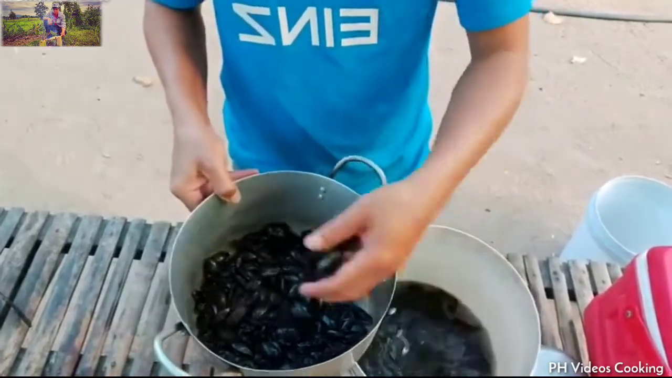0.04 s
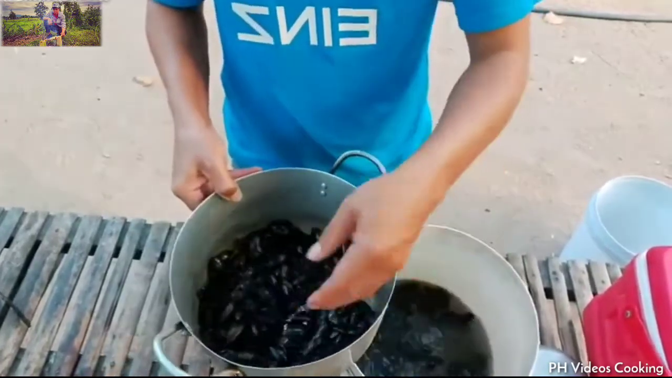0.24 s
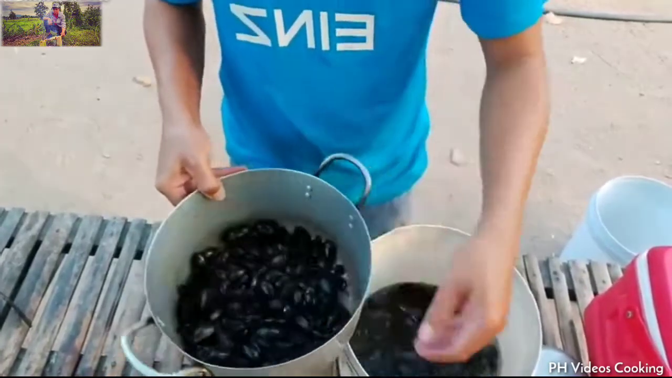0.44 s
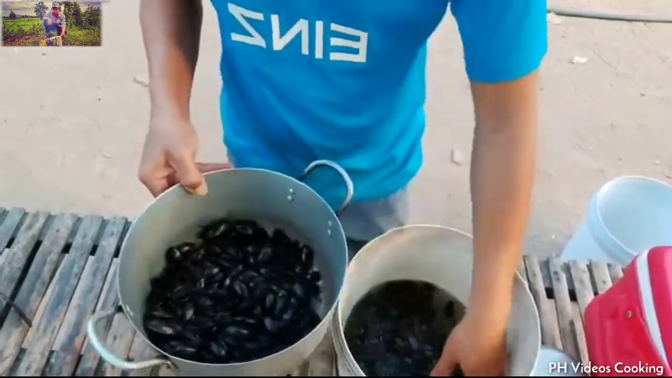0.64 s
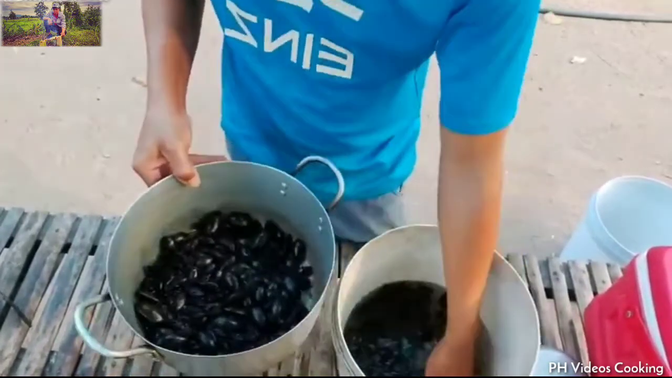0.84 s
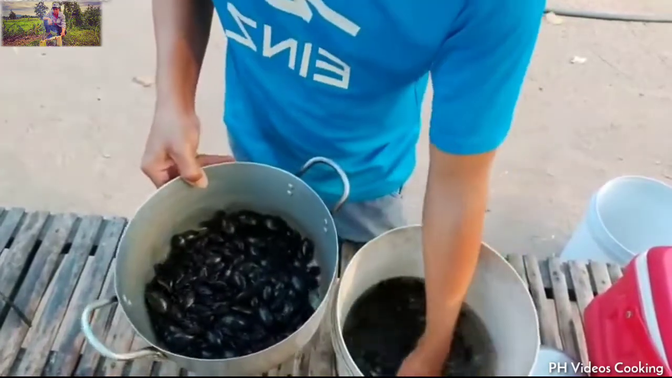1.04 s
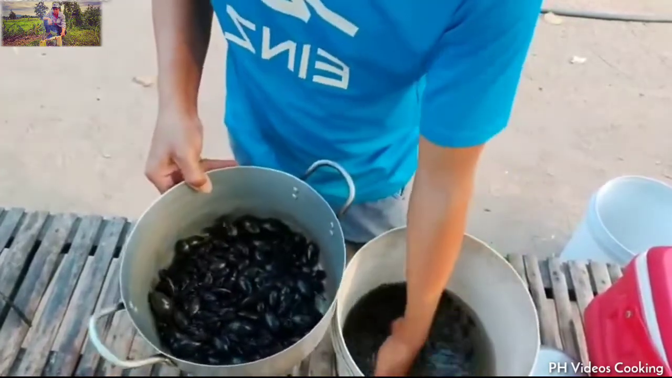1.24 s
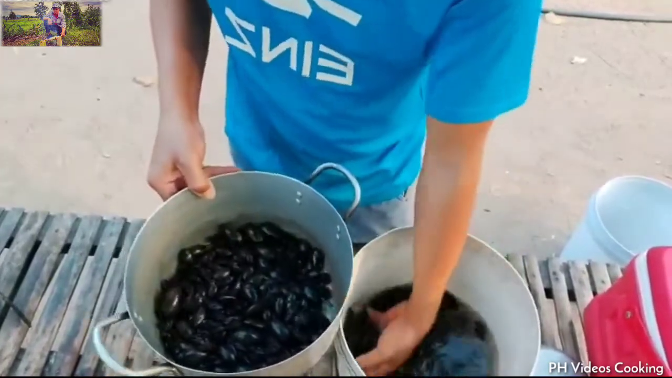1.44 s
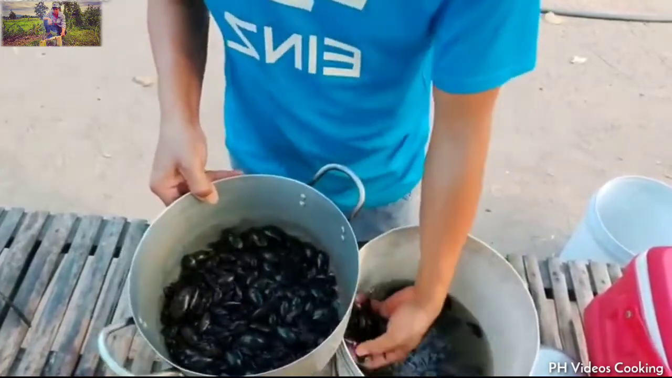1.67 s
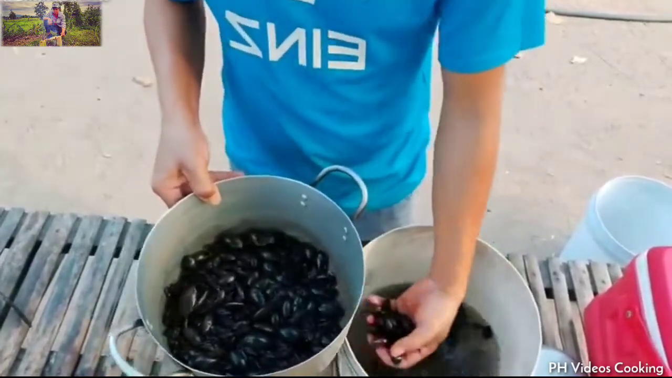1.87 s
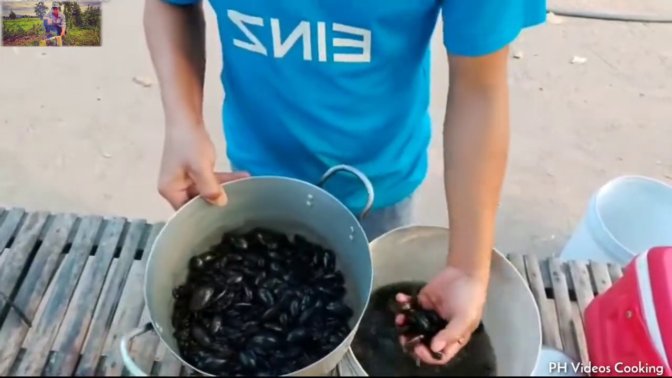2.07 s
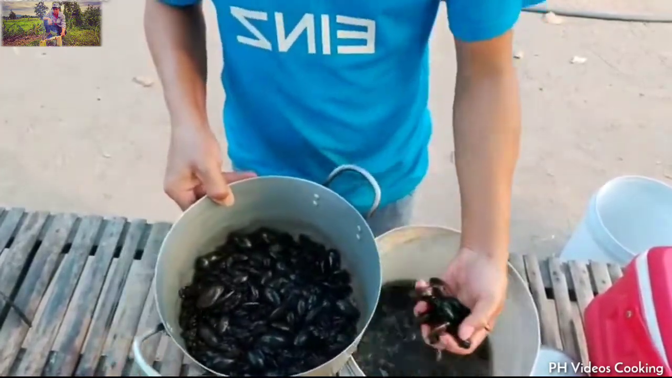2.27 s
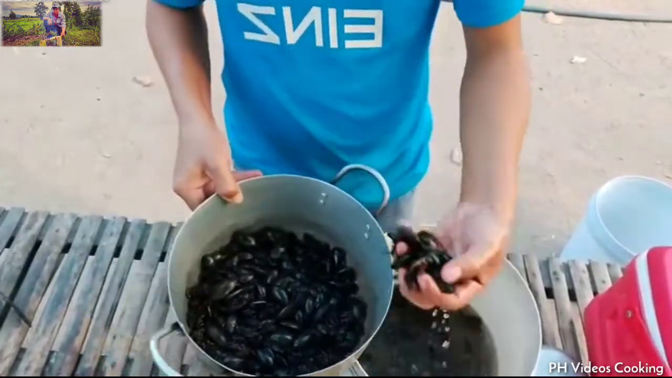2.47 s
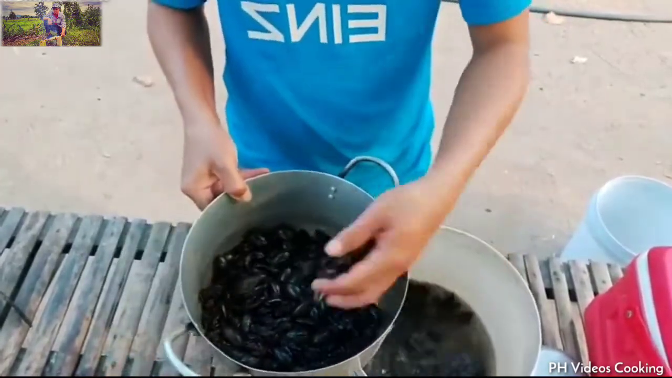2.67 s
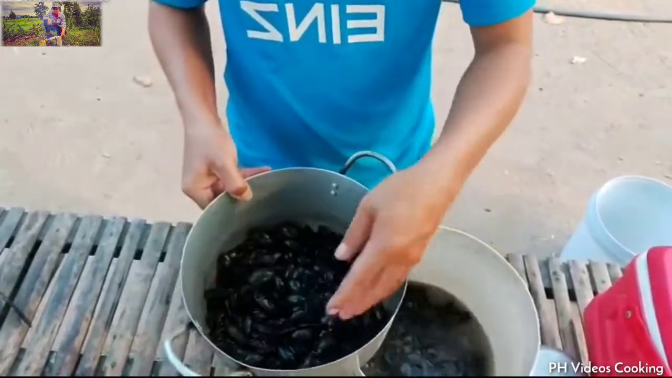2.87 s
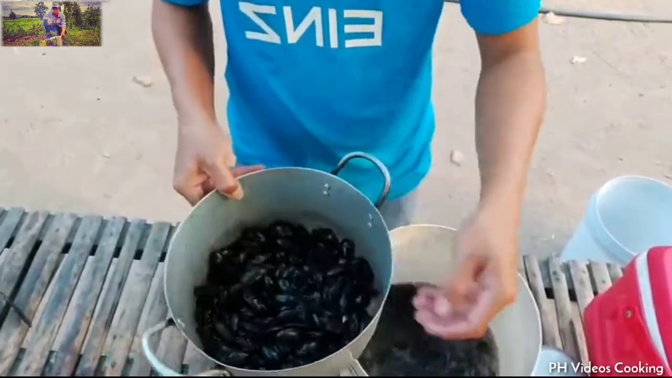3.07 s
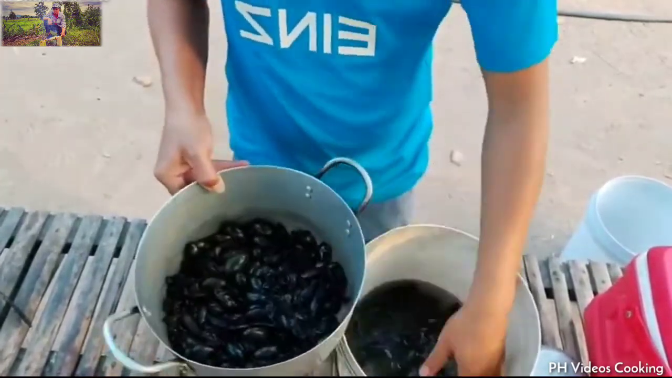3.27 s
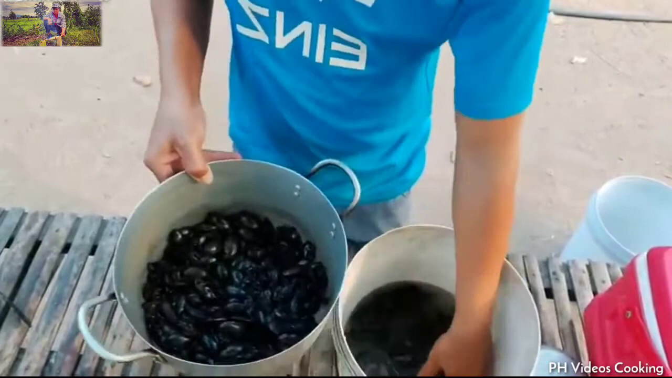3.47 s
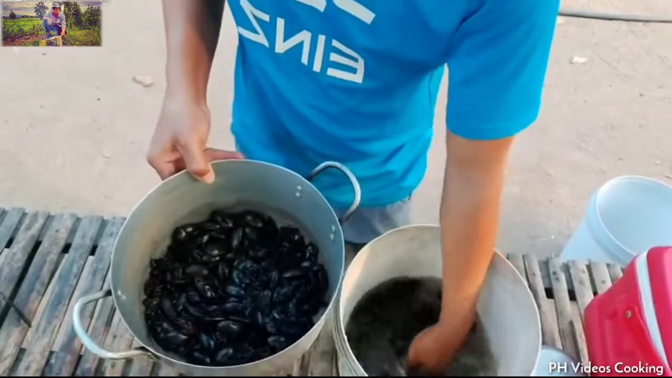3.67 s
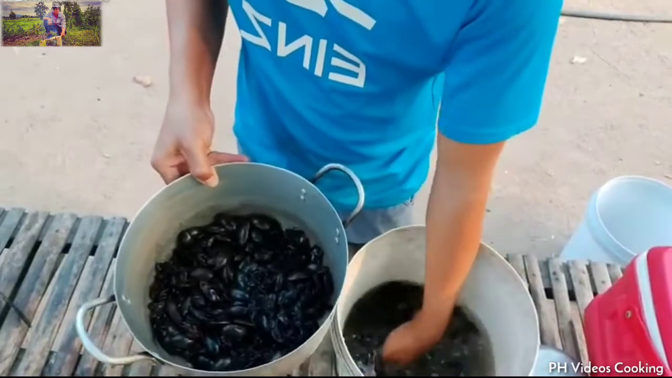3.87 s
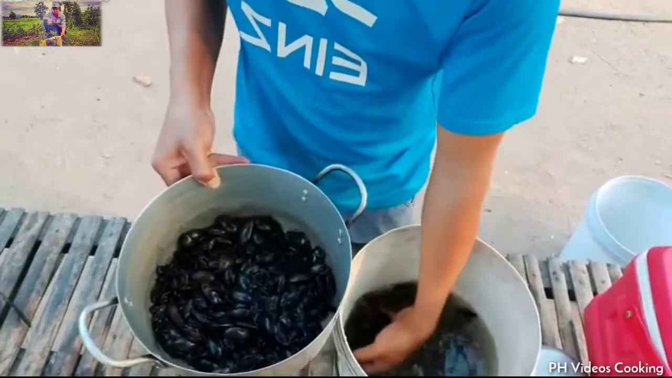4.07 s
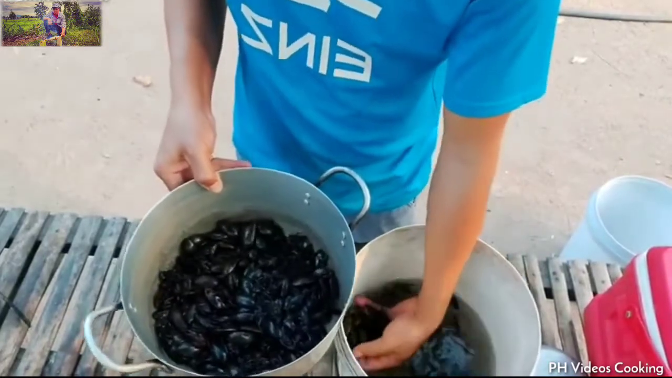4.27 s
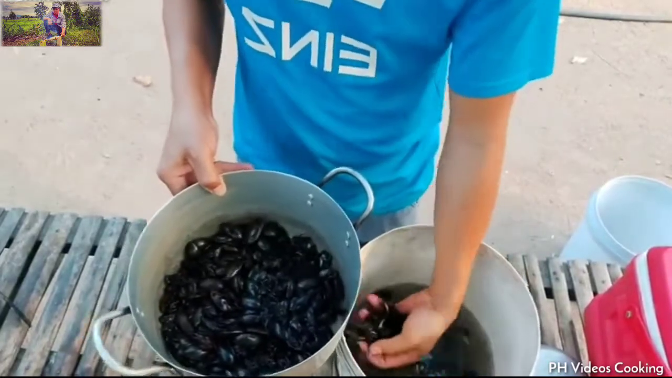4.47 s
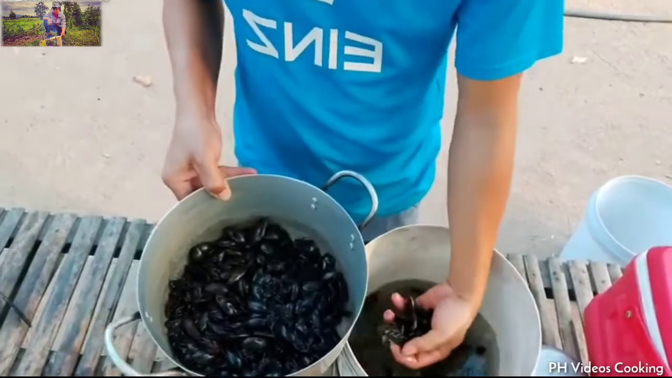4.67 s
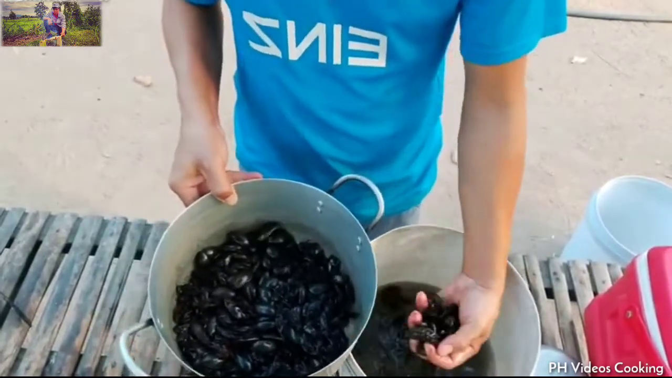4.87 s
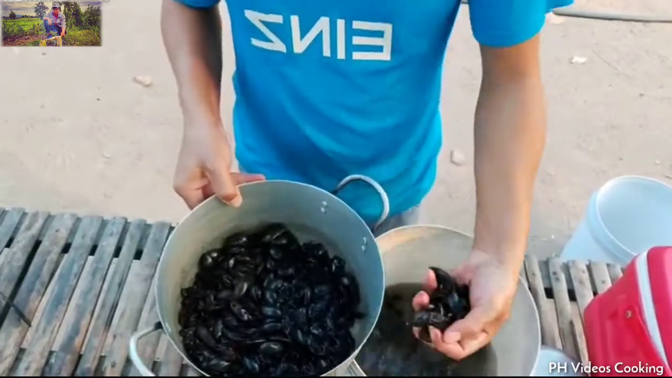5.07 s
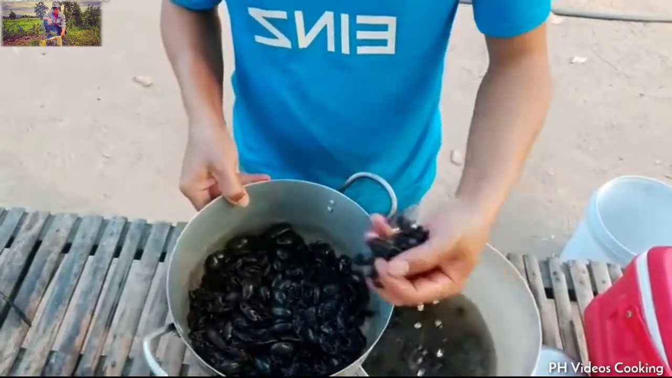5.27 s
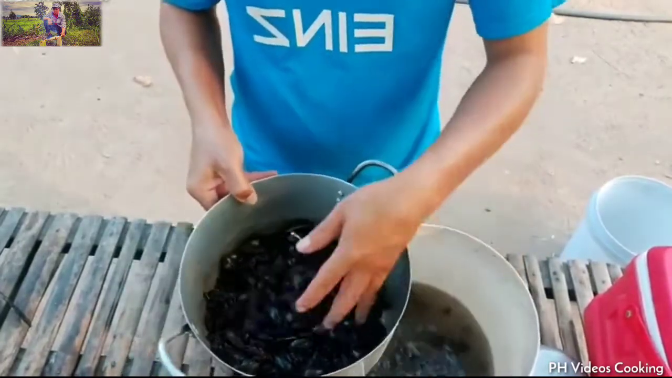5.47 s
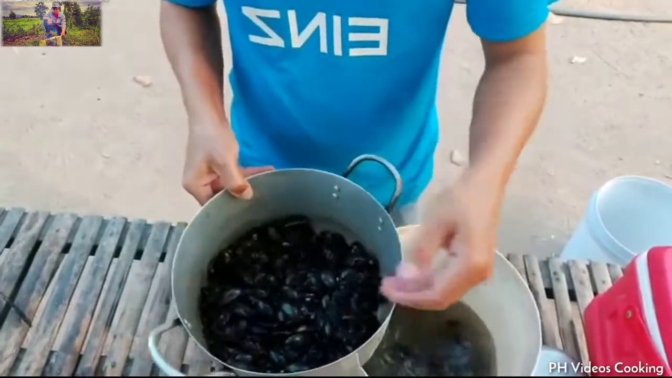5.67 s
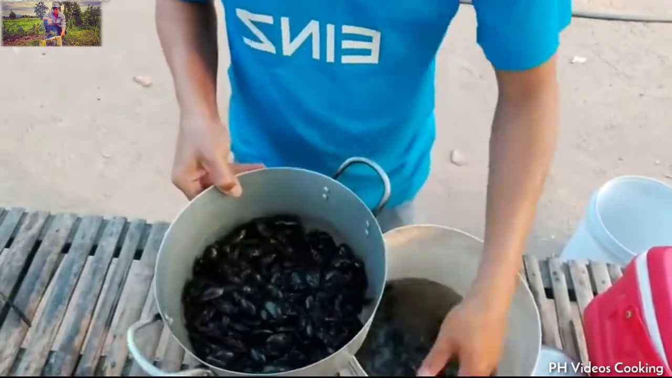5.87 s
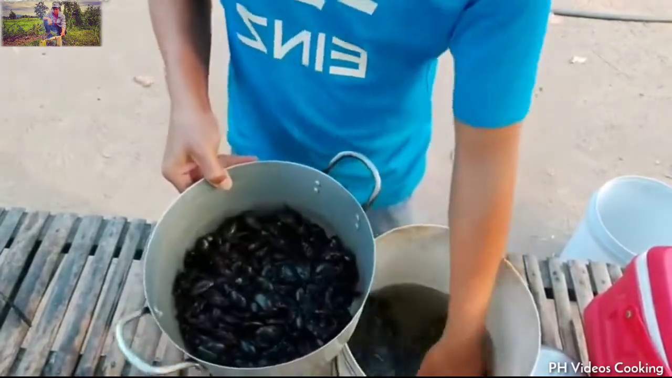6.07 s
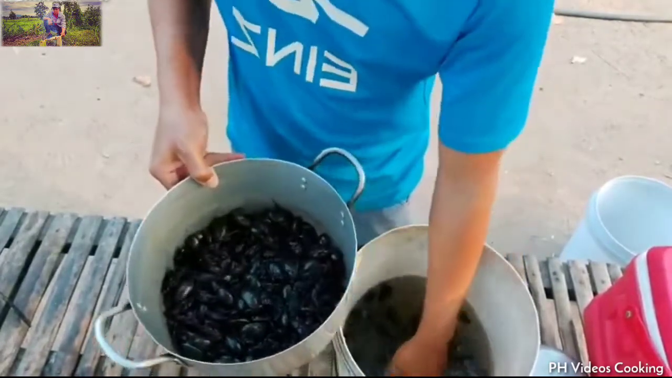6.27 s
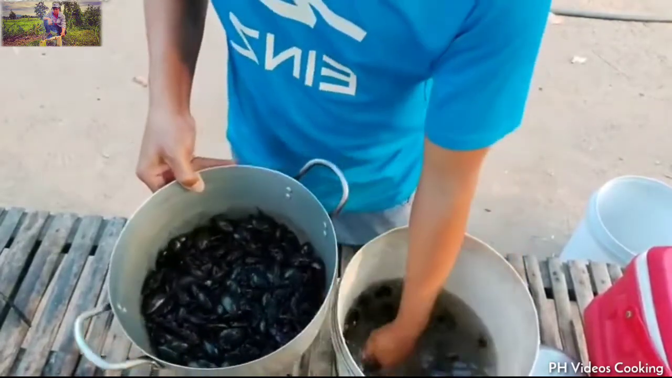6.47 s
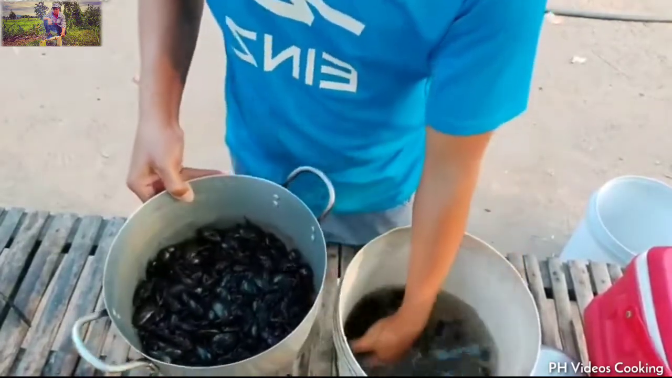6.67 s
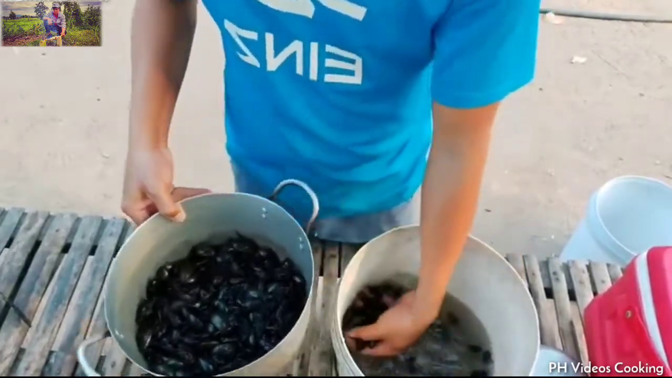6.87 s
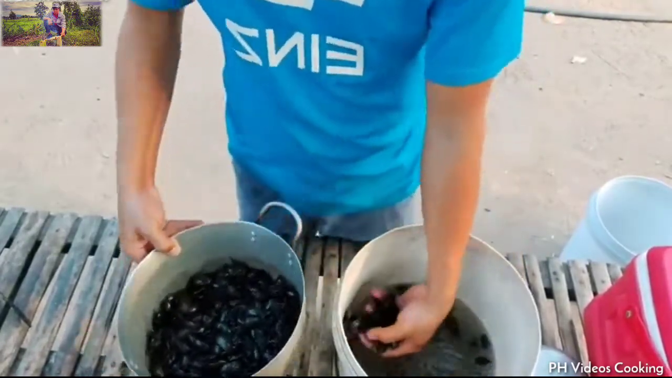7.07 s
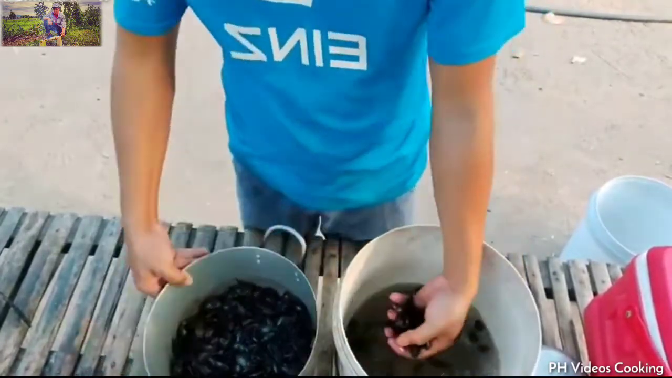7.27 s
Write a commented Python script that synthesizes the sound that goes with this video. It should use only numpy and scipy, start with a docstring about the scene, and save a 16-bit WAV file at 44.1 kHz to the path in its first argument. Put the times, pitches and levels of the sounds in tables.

```python
"""Outdoors, a hand rummages for small shellfish in a metal tub of water and drops three handfuls into a half-full pot.
Each handful clatters on the heap (filtered noise and tiny rings) and thumps the pot (decaying tones). Between them
shells rub and knock under water, bubbles and drips ring, the lifted hand dribbles, and the pot bumps on its
slatted bench. A steady hush and the rumble of a light breeze, both filtered noise, lie underneath."""
import sys
import numpy as np
from scipy import signal
from scipy.fft import rfft, irfft
from scipy.io import wavfile
from scipy.ndimage import uniform_filter1d

SR = 44100
rng = np.random.default_rng(int(sys.argv[2]) if len(sys.argv) > 2 else 0)


def log_audio(samples):
    """Write samples as a 16-bit WAV file to the path given in sys.argv[1]."""
    # one column per channel
    frames = np.atleast_2d(samples).T
    # limit to full scale, then quantise
    limited = np.clip(frames, -1, 1)
    pcm = np.round(limited * 32767).astype(np.int16)
    wavfile.write(sys.argv[1], SR, pcm)


N = 323244  # samples
T = np.arange(N) / SR  # seconds
SHORT = T[:SR // 3]  # time axis of one brief sound, seconds
POT_LEAD_MS, TUB_LEAD_MS = 0.14, 0.062  # how much earlier the left side hears each vessel
TOP_HZ = 15700

# In all tables, t60 is the time a ring takes to fall by 60 dB, and levels are relative.
# Handfuls sliding on to the heap, which then settles. Each row: start in seconds, pouring time in seconds,
# clatter in dB, pot boom in dB, settling time in seconds, settling in dB, treble boost in dB.
HANDFULS = [(0.236, 0.049, -31, -27.5, 0.27, -49.5, 3), (2.834, 0.053, -35, -34.5, 0.33, -50.5, -0.5),
            (5.552, 0.034, -29, -31, 0.19, -44, -2)]
# Scoops: the hand gropes, rakes shells together, then lifts them out to drain.
# Each row: start of raking in seconds, raking time in seconds, level at its end in dB.
SCOOPS = [(1.0, 0.59, -49.5), (3.918, 0.27, -49.5), (6.5, 0.31, -48)]
# Tone colour of fine water spray. Each row: frequency in Hz, level in dB.
SPRAY = [(4000, -16.5), (6500, -2), (10500, -1.5), (15500, -7)]


def handfuls():
    """Shells shower on the heap in clumps with small clacks of many pitches; the wall rings and the loaded pot booms."""
    # The heaviest clumps landing. Each row: start in seconds, crash in dB, thump in dB, thump pitch in Hz.
    clumps = [(0.202, -28, -32.5, 468), (0.236, -17, -18.5, 506), (0.258, -19, -23, 490),
              (0.278, -26, -18, 484), (0.297, -30, -21.5, 492), (0.331, -32, -27, 488),
              (0.35, -39, -28.5, 503), (0.388, -45, -33.5, 462), (2.808, -18, -33, 458),
              (2.831, -19, -25, 464), (2.845, -17.5, -19.5, 500), (2.871, -15.5, -14, 510),
              (2.901, -23.5, -22, 434), (2.928, -20.5, -55, 452), (5.521, -20, -30, 490),
              (5.551, -12.5, -26.5, 515), (5.584, -16.5, -20, 510), (5.593, -20, -24, 340),
              (5.631, -22.5, -32, 496), (5.661, -22.5, -40, 438), (5.725, -28, -45, 427),
              (5.769, -38, -47, 490)]
    # Tone colour of the heap. Each row: frequency in Hz, level in dB.
    heap = [(380, -16), (650, -9), (848, -2.5), (1150, 0.5), (1550, -7), (2030, -6), (2230, -8),
            (2520, -4.5), (3280, -1.5), (5290, -5.5), (12000, -5), (15500, -9)]
    # Ringing tones of the pot, then of its wall. Each row: pitch in Hz, t60 in seconds, level in dB.
    pot_modes = [(390, 0.039, -23), (449, 0.076, -4.5), (482, 0.15, -3), (513, 0.052, -10), (528, 0.08, -8),
                 (1077, 0.098, -13)]
    wall_modes = [(1980, 0.3, -4), (2840, 0.19, -2), (2920, 0.099, -17), (2990, 0.031, 9),
                  (3250, 0.067, -25), (3300, 0.088, 3), (4390, 0.17, 1), (4930, .2, -2), (5984, 0.1, 1)]
    crashes, thumps = np.zeros((2, N)), np.zeros((2, N))
    for s, crash_db, thump_db, hz in clumps:
        # the first hard contact dies fast, a weaker tail follows
        crash = amp(-13.5) * fade(0.1) + amp(-12) * fade(0.013)
        add(crashes, s, amp(crash_db) * crash[None])
        thump = ring([(hz, .048, 0)], POT_LEAD_MS) * (1 - fade(0.038))
        add(thumps, s, amp(thump_db + 5) * thump)
    pour, weight = pouring()
    shower = together(amp(3.0) * pour, crashes)
    scrape = contacts(rate=1700, spread_db=1.5, t60=0.012) * pair(POT_LEAD_MS, apart_hz=2400)
    clacks = grains(rate=1100, low_hz=1460, high_hz=15930, cycles=89, rise=0, spread_db=2.0, apart_hz=1600)
    clatter = brighten(colour(shower * (amp(-0.5) * scrape + amp(-7) * clacks), heap))
    boom = excite(pair(POT_LEAD_MS, apart_hz=3500), pot_modes) * weight
    wall = amp(-17.5) * excite(clatter, wall_modes)
    return clatter + wall + above(thumps + amp(-7.5) * boom, hz=300)


def pouring():
    """Strength of the clatter and of the boom: each handful arrives fast, dies away and leaves the heap settling."""
    rise, fall, boom_fall, sag = 600, 230, 141, 22  # dB per second
    clatter, boom = 0, 0
    for s, length, clatter_db, boom_db, settle_s, settle_db, _ in HANDFULS:
        settling = amp(settle_db) * swell(s, settle_s, rise, fall, -sag)
        landing = amp(clatter_db) * swell(s, length, rise, fall)
        clatter += np.maximum(landing, settling)
        landing_boom = amp(boom_db) * swell(s, length, rise, boom_fall)
        boom += np.maximum(landing_boom, amp(1.5) * settling)
    return clatter, boom


def brighten(clatter):
    """Each handful has its own share of treble; the share slides from one to the next."""
    rows = np.array(HANDFULS)
    treble = signal.lfilter(*signal.butter(1, 2800, "high", fs=SR), clatter)
    boost = amp(np.interp(T, rows[:, 0], rows[:, -1]))
    return clatter + (boost - 1) * treble


def ticks():
    """A lone shell strikes: a sharp crack, its own brief ring, and reflections off the metal wall."""
    # Hard dry contacts of single shells. Each row: start in seconds, level in dB, ring pitch in Hz.
    tick_rows = [(0.39, -12, 8800), (0.4762, -23, 10950), (1.1363, -32, 8300), (1.5814, -29.5, 4130),
                 (1.84, -36, 4470), (2.0782, -28.5, 9660), (2.167, -30, 10540), (2.175, -36.5, 5360),
                 (2.2697, -34, 8230), (2.282, -36.5, 4070), (2.6268, -33.5, 4150), (2.9986, -27.5, 4600),
                 (3.7313, -26.5, 4750), (4.8906, -25, 4760), (4.9668, -28.5, 7500), (5.036, -32.5, 5570),
                 (5.3403, -27, 9560), (5.6756, -12, 7060), (5.6917, -17, 8100), (6.367, -33.5, 3580)]
    # Tones of one shell. Each row: multiple of the ring pitch, t60 in seconds, level in dB.
    shell_ring = [(.62, 0.02, -27), (.9, 0.011, -7), (1, 0.015, 0.5), (1.14, 0.011, -2), (1.4, .012, -22)]
    out = np.zeros((2, N))
    for s, db, hz in tick_rows:
        modes = [(min(ratio * hz, TOP_HZ), t60, mode_db) for ratio, t60, mode_db in shell_ring]
        shell = ring(modes, rng.uniform(0, 0.037), scatter=0.035)
        echo = resonate(crack(0.043, POT_LEAD_MS, apart_hz=4020), hz, q=1.2)
        strike = crack(0.011, POT_LEAD_MS, apart_hz=5000)
        tick = amp(-7.0) * shell + amp(1.0) * strike + echo
        add(out, s, amp(db) * tick * (1 - fade(0.003)))  # soften the attack
    return out


def rummage():
    """Shells rub dully under water among bubbles, rattle as they break the surface and shed a fine spray."""
    # Tone colours of rubbing under water and of rattling. Each row: frequency in Hz, level in dB.
    sunken_colour = [(130, -51.5), (220, -14), (269, -14), (329, 3), (417, 0), (482, -6), (527, -4.5),
                     (690, -10), (882, 2.5), (1040, -13.5), (1380, 0), (1910, -5.5), (2090, -31),
                     (2800, -14), (3200, -33), (4160, -53), (7040, -120)]
    rattle_colour = [(1200, -35), (2000, 2), (3000, 0), (4300, 3), (6000, -1), (8000, -28)]
    # Wet shells shifting in the hand above the water. Each row: start in seconds, length in seconds, level in dB.
    shakes = [(0.0, 0.023, -60.5), (0.14, 0.046, -63.5), (0.6, 0.22, -60), (1.53, 0.18, -59.5),
              (2.08, 0.13, -65), (4.27, 0.17, -53.5), (4.78, 0.26, -56), (5.47, 0.022, -60),
              (6.92, 0.029, -51), (7.08, 0.1, -55)]
    # Water gulping as it closes round the arm. Each row: start in seconds, length in seconds, level in dB.
    sloshes = [(3.265, 0.026, -47), (3.37, 0.067, -49), (3.52, 0.064, -53.5), (3.67, 0.028, -51),
               (4.765, 0.082, -52), (5.84, 0.15, -59)]

    rubbing = contacts(rate=500, spread_db=5, t60=0.056) * pair(TUB_LEAD_MS, apart_hz=2800)
    bubbles = grains(rate=390, low_hz=802, high_hz=2140, cycles=39, rise=0.15, spread_db=6, apart_hz=3300)
    sunken = amp(-0.5) * colour(rubbing, sunken_colour) + amp(-7) * bubbles

    clicks = grains(rate=350, low_hz=1916, high_hz=5630, cycles=106, rise=0.11, spread_db=4.5, apart_hz=2180)
    jostling = contacts(rate=390, spread_db=6.5, t60=0.045) * pair(TUB_LEAD_MS, apart_hz=2230)
    rattle = amp(-1.5) * colour(jostling, rattle_colour) + clicks

    droplets = grains(rate=310, low_hz=6280, high_hz=15100, cycles=31, rise=0.052, spread_db=8, apart_hz=2000)
    mist = contacts(rate=550, spread_db=5.5, t60=0.045) * pair(TUB_LEAD_MS, apart_hz=3000)
    spray = amp(3.0) * colour(mist, SPRAY) + amp(-5) * droplets

    deep = grains(rate=430, low_hz=227, high_hz=874, cycles=12.7, rise=0.25, spread_db=-6.0, apart_hz=2800)
    gulps = amp(-4.5) * above(deep, hz=180)

    stir = scooping()
    shake = gestures(shakes, rise_db_per_s=159, fall_db_per_s=144)
    slosh = gestures(sloshes, rise_db_per_s=900, fall_db_per_s=208)
    # shells tick all through a scoop; the wet hand never stops dripping
    dribble = sum(swell(s - 0.46, 0.46 + length + 0.73, 88, 60) for s, length, _ in SCOOPS)
    rattling = together(shake, amp(-13) * stir, amp(-67.5) * dribble)
    spraying = together(amp(-2.5) * shake, amp(-14) * stir, amp(-66.5))
    return stir * sunken + slosh * gulps + rattling * rattle + spraying * spray


def scooping():
    """Strength of the stirring in the tub: light groping, raking that grows as the hand fills, then run-off."""
    rise, growth, fall = 88, 10, 60  # dB per second
    grope_s, drain_s = 0.46, 0.73  # before and after the raking
    stir = 0
    for s, length, db in SCOOPS:
        grope = amp(-60) * swell(s - grope_s, grope_s, rise, fall)
        rake = amp(db - growth * length) * swell(s, length, rise, fall, growth)
        drain = amp(-65) * swell(s + length, drain_s, rise, fall)
        stir += np.max([grope, rake, drain], axis=0)
    return stir


def knocks():
    """Water damps each knock to a brief ring; reflections follow and the tub answers with its own low modes."""
    # Shells knocking on the tub under water. Each row: start in seconds, level in dB, pitch in Hz, tub boom in dB.
    knock_rows = [(0.717, -23.5, 1610, -41.5), (0.729, -28.5, 1590, -41), (0.841, -37.5, 1080, -44.5),
                  (1.155, -27, 1670, -35.5), (1.224, -24, 890, -33.5), (1.311, -53, 890, -38.5),
                  (1.384, -40, 1520, -51), (3.4, -28.5, 1600, -47), (3.631, -36.5, 1590, -62),
                  (3.96, -30.5, 1830, -48), (4.017, -32, 1340, -43.5), (4.045, -27, 1530, -41.5),
                  (4.219, -17, 1545, -56), (4.309, -26.5, 1590, -56), (4.33, -15.5, 1580, -64),
                  (4.386, -25.5, 1550, -65), (4.731, -35.5, 1550, -70), (4.794, -35, 920, -41),
                  (6.111, -32, 1030, -46), (6.292, -37, 870, -52), (6.584, -19.5, 1320, -35),
                  (6.614, -31, 1200, -39), (6.976, -25.5, 1670, -42.5), (7.107, -32.5, 960, -52),
                  (7.279, -33.5, 1010, -53)]
    # Ringing tones of the tub. Each row: pitch in Hz, t60 in seconds, level in dB.
    tub_modes = [(349.5, 0.13, -3), (424, 0.041, 5.5), (522, 0.02, 10), (955, 0.17, -8.5), (934, 0.066, -5),
                 (1352, 0.036, -2), (1560, 0.057, -6.5)]
    out = np.zeros((2, N))
    for s, db, hz, boom_db in knock_rows:
        core = ring([(hz, .014, 0), (1.202 * hz, .012, -6)], TUB_LEAD_MS) * (1 - fade(0.0038))
        echo = resonate(crack(0.08, TUB_LEAD_MS, apart_hz=3500), hz, q=3.8)
        contact = crack(0.013, TUB_LEAD_MS, apart_hz=3000)
        knock = amp(-2.5) * core + amp(9) * echo + amp(-13.0) * contact
        boom = ring(tub_modes, TUB_LEAD_MS, scatter=0.023) * (1 - fade(0.016))
        add(out, s, amp(db) * knock + amp(boom_db - 2.5) * boom)
    return out


def surges():
    """Water churns through the fingers; each surge swells and ebbs: a froth of small bubbles around one pitch."""
    # Each row: start in seconds, length in seconds, level in dB, centre pitch in Hz.
    surge_rows = [(0.691, 0.069, -47.5, 1720), (1.518, 0.11, -45.5, 3220), (1.554, 0.2, -46, 1740),
                  (3.227, 0.12, -53.5, 1400), (3.95, 0.29, -59, 1400), (4.30, 0.25, -54, 1900),
                  (4.77, 0.17, -53, 2800), (6.038, 0.11, -57.5, 2420), (6.256, 0.07, -52, 1500),
                  (6.773, 0.13, -49, 2000), (6.873, 0.23, -48, 3024), (7.05, 0.18, -52, 1710)]
    churn = contacts(rate=1100, spread_db=-3, t60=0.0096) * pair(TUB_LEAD_MS, apart_hz=2600)
    bubbles = grains(rate=570, low_hz=1010, high_hz=4770, cycles=23, rise=0.09, spread_db=-2.0, apart_hz=3040)
    froth = churn + amp(-4.5) * bubbles
    out = np.zeros((2, N))
    for s, length, db, hz in surge_rows:
        piece = resonate(froth[:, int(s * SR):int((s + length) * SR)], hz, q=1.3)
        add(out, s, amp(db) * unit(piece) * np.hanning(piece.shape[1]))
    return out


def splashes():
    """Fingers and falling water slap the surface, each slap with a fizz of droplets."""
    # Each row: start in seconds, slap level in dB, bright fizz level in dB.
    splash_rows = [(0.605, -40, -46.5), (0.668, -33.5, -41), (0.731, -34, -40), (3.422, -38, -47.5),
                   (3.668, -34, -44.5), (3.715, -40.5, -45.5), (3.886, -30.5, -53), (4.449, -44, -48),
                   (4.589, -41, -55), (4.651, -40.5, -56.5), (4.778, -42, -47), (5.421, -34.5, -48),
                   (6.053, -29.5, -45), (6.936, -28.5, -61), (7.156, -37.5, -52), (7.278, -37.5, -52)]
    # Tone colour of a slap. Each row: frequency in Hz, level in dB.
    slap_colour = [(250, -13.5), (400, 7.5), (520, -1), (680, -17), (1000, 4), (1800, 0), (3000, 0),
                   (5000, 0), (8000, -38)]
    slaps, fizz = np.zeros((2, N)), np.zeros((2, N))
    wetting = 1 - fade(0.004)  # water yields, so the sound takes a moment to build
    for s, db, fizz_db in splash_rows:
        add(slaps, s, amp(db - 8.5) * (wetting * fade(0.12))[None])
        add(fizz, s, amp(fizz_db + 6.0) * (wetting * fade(0.068))[None])
    grain = contacts(rate=990, spread_db=6.0, t60=0.023) * pair(TUB_LEAD_MS, apart_hz=2550)
    return colour(slaps * grain, slap_colour) + colour(fizz * grain, SPRAY)


def drips():
    """Drops trap bubbles, which ring and rise a little in pitch."""
    # Each row: start in seconds, level in dB, pitch in Hz, t60 in seconds.
    drip_rows = [(2.078, -49, 1590, 0.035), (2.111, -49, 1210, 0.037), (2.283, -50, 2880, 0.047),
                 (2.672, -52, 2750, 0.04), (3.451, -49, 2840, 0.05), (3.732, -44, 4770, 0.031),
                 (3.883, -42, 3980, 0.022), (4.277, -40.5, 4000, 0.038), (4.95, -43, 4000, 0.077),
                 (5.119, -47, 4330, 0.036), (5.132, -47.5, 2970, 0.022), (5.666, -33.5, 2210, 0.031),
                 (6.233, -54.5, 853, 0.16), (6.291, -45, 875, 0.085)]
    out = np.zeros((2, N))
    for s, db, hz, t60 in drip_rows:
        bubble = ring([(hz, t60, 0)], rng.uniform(-0.063, 0.081), glide=1.9)
        add(out, s, amp(db + 5.5) * bubble)
    return out


def trickles():
    """Each thread of water, off the hand or gurgling past it, hisses in a narrow band that sinks as it thins."""
    # Each row: start in seconds, length in seconds, level in dB, start pitch in Hz, end pitch in Hz.
    trickle_rows = [(2.017, 0.073, -65, 5040, 4070), (2.166, 0.075, -66.5, 4030, 3440),
                    (2.216, 0.071, -70, 3230, 2870), (2.328, 0.075, -65, 4570, 4000),
                    (2.312, 0.067, -66, 1880, 1410), (2.66, 0.066, -74, 2850, 2800),
                    (4.821, 0.09, -58, 2140, 2013), (4.953, 0.085, -56, 7640, 7560),
                    (5.289, 0.1, -69, 1910, 1610), (5.812, 0.2, -68.5, 760, 499),
                    (6.222, 0.15, -65, 890, 865)]
    out = np.zeros((2, N))
    for s, length, db, start_hz, end_hz in trickle_rows:
        width_hz = 150 + 0.091 * start_hz
        shared, left, right = (swish(length, start_hz, end_hz, width_hz) for _ in range(3))
        hiss = shared + 3.1 * np.array([left, right])
        add(out, s, amp(db) * hiss * np.hanning(len(shared)))
    return out


def bumps():
    """The pot's base thuds on the slats; bending waves follow, the lowest arriving last."""
    # The pot rocking on the bench. Each row: start in seconds, knock level in dB, low shudder level in dB.
    bump_rows = [(2.444, -15.5, -49.5), (5.031, -31.5, -54), (5.057, -30.5, -66)]
    # Ringing tones of the bench. Each row: pitch in Hz, t60 in seconds, level in dB.
    bench_modes = [(340, 0.11, -5.5), (433, 0.08, -9), (960, .06, -13), (1330, 0.017, -9)]
    out = np.zeros((2, N))
    for s, db, shudder_db in bump_rows:
        noise = pair(TUB_LEAD_MS, apart_hz=3000, count=len(SHORT))
        scuff = resonate(noise * fade(0.09), hz=1370, q=2.4)
        thud = ring(bench_modes, TUB_LEAD_MS, scatter=0.029)
        add(out, s, amp(db - 9.5) * (thud + amp(-2.5) * scuff))
        for start_hz, end_hz in [(381.0, 65), (212, 56.6)]:
            shudder = swish(0.22, start_hz, end_hz, width_hz=150)
            add(out, s, amp(shudder_db) * (shudder * fade(0.47)[:len(shudder)])[None])
    return out


def outdoors():
    """Steady open-air hush and the low rumble of a light breeze, both shaped noise."""
    # Tone colours of the hush and of the breeze. Each row: frequency in Hz, level in dB.
    air = [(15, -38), (25, -10), (71, -6), (240, -18), (410, 10), (666, -3), (804, -27), (945, 3),
           (2230, -7), (4260, 2.5), (6050, -29), (7500, -1.5), (11500, -39), (14300, -2), (15500, -23)]
    breeze = [(25, -37), (42, -4), (58, 3), (90, -2.5), (160, -4.5), (260, -10), (500, -18)]
    hush = amp(-63) * colour(pair(0, apart_hz=1420), air)
    rumble = amp(-59.0) * colour(pair(0, apart_hz=164), breeze)
    return hush + rumble


def ring(modes, lead_ms, scatter=0., glide=0.):
    """Struck (Hz, t60, dB) tones on both sides; scatter varies the pitch, glide is its relative rise per second."""
    t = np.maximum(SHORT - np.array([[0], [lead_ms / 10 ** 3]]), 0)
    out = 0
    for hz, t60, db in modes:
        pitch = hz * (1 + scatter * rng.standard_normal())
        out = out + amp(db) * fade(t60) * np.sin(2 * np.pi * pitch * t * (1 + glide * t / 2))
    return out


def crack(t60, lead_ms, apart_hz):
    """A burst of contact noise with peak 1."""
    burst = pair(lead_ms, apart_hz, count=len(SHORT)) * fade(t60)
    return burst / np.abs(burst).max()


def contacts(rate, spread_db, t60):
    """Envelope of many tiny collisions (rate per second) of uneven size, each dying quickly."""
    sizes = amp(spread_db * np.minimum(rng.exponential(size=N), 3.5))
    strikes = (rng.random(N) < rate / SR) * sizes
    power = signal.oaconvolve(strikes ** 2, fade(t60) ** 2)[:N].clip(1e-9)
    return np.sqrt(power / uniform_filter1d(power, size=6000))  # even out the slow swells


def grains(rate, low_hz, high_hz, cycles, rise, spread_db, apart_hz):
    """Little rings at random moments, each with its own pitch, steady if rise is 0 and else climbing by that share."""
    out = np.zeros((2, N))
    for when, pitch, size, turn, side in rng.random((int(rate * N / SR), 5)):
        hz = low_hz * (high_hz / low_hz) ** pitch
        age = np.linspace(0, 1, num=int(cycles * SR / hz) + 2)
        phase = 2 * np.pi * cycles * age * (1 + rise * age / 2)
        # left and right differ in phase, more so at high pitch
        skew = np.array([[1], [-1]]) * (side - .5) * np.pi * min(hz / apart_hz, 2)
        strength = amp(spread_db * min(-np.log(1 - size), 3)) * np.sign(turn - .5)
        grain = np.exp(-np.log(1000) * age) * np.sin(phase + skew)
        add(out, when * N / SR, strength * grain)
    return unit(out)


def swish(length, start_hz, end_hz, width_hz):
    """A narrow band of noise whose centre glides."""
    count = int(length * SR)
    low_pass = signal.butter(2, width_hz / 2, fs=SR, output="sos")
    wobble = signal.sosfilt(low_pass, rng.standard_normal((2, count + 2000)))[:, -count:]
    phase = 2 * np.pi * np.cumsum(np.geomspace(start_hz, end_hz, count)) / SR
    return unit(wobble[0] * np.cos(phase) + wobble[1] * np.sin(phase))


def pair(lead_ms, apart_hz, count=N):
    """Noise on two sides: alike in the bass, increasingly unrelated above apart_hz."""
    f = np.fft.rfftfreq(count, 1 / SR)
    common, left, right = rfft(rng.standard_normal((3, count)))
    alike = 1 / (1 + (f / apart_hz) ** 2)
    late = np.exp(-2j * np.pi * f * lead_ms / 10 ** 3)  # delays the right side
    shared = np.sqrt(alike) * np.array([common, common * late])
    separate = np.sqrt(1 - alike) * np.array([left, right])
    return irfft(shared + separate, count)


def excite(x, modes):
    """Drive a set of ringing tones with a sound."""
    body = ring(modes, 0)[:1]
    return signal.oaconvolve(x, body / np.linalg.norm(body), axes=1)[:, :N]


def colour(x, points):
    """Filter with the given (Hz, dB) outline that never sounds ahead of its input."""
    hz, db = np.transpose(points)
    size = 4096
    f = np.maximum(np.fft.rfftfreq(size, 1 / SR), 1)
    # folding the cepstrum (the spectrum of the log outline) gives minimum phase
    cepstrum = irfft(np.log(amp(np.interp(np.log(f), np.log(hz), db))))
    cepstrum[1:size // 2] *= 2
    response = irfft(np.exp(rfft(cepstrum[:size // 2], size)))[:size // 2]
    response = response / np.linalg.norm(response)
    return signal.oaconvolve(x, response[None], axes=1)[:, :x.shape[1]]


def resonate(x, hz, q):
    """One broad resonance."""
    return signal.lfilter(*signal.iirpeak(min(hz, SR / 2 - 2000), max(q, 1), SR), x)


def above(x, hz):
    """High-pass."""
    return signal.sosfilt(signal.butter(2, hz, "high", fs=SR, output="sos"), x)


def swell(s, length, rise_db_per_s, fall_db_per_s, slope_db_per_s=0):
    """Gain that rises to 1 at time s, holds or slopes for a length, then falls away."""
    before, after = np.maximum(s - T, 0), np.maximum(T - s - length, 0)
    during = np.clip(T - s, 0, length)
    db = slope_db_per_s * during - rise_db_per_s * before - fall_db_per_s * after
    return amp(np.maximum(db, -200))


def gestures(rows, rise_db_per_s, fall_db_per_s):
    """Strength over time of (seconds, length, dB) movements that share one rise and fall."""
    return sum(amp(db) * swell(s, length, rise_db_per_s, fall_db_per_s) for s, length, db in rows)


def together(*gains):
    """Combined strength of unrelated causes: their powers add."""
    return np.sqrt(sum(gain ** 2 for gain in gains))


def fade(t60):
    """Exponential die-away, 60 dB in t60 seconds."""
    return np.exp(-np.log(1000) * SHORT / max(t60, 1e-3))


def amp(db):
    """Decibels to gain."""
    return 10 ** (np.asarray(db) / 20)


def unit(x):
    """Scale to rms 1."""
    return x / np.sqrt(np.mean(x ** 2))


def add(out, s, sound):
    """Mix a sound in at time s."""
    start = max(int(s * SR), 0)
    out[:, start:start + sound.shape[1]] += sound[:, :N - start]


def scene():
    """All sources, the left side slightly louder."""
    pot = handfuls() + ticks() + bumps()
    tub = rummage() + above(knocks(), hz=204) + surges() + splashes() + drips() + trickles()
    return (pot + tub + outdoors()) * amp(0.22 * np.array([[1], [-1]]))


def record(dry):
    """Thin the deepest bass and cut the top steeply."""
    top_cut = signal.ellip(10, .2, 70, TOP_HZ, fs=SR, output="sos")
    return signal.sosfilt(top_cut, above(dry, hz=39.7))


dry = scene()
out = record(dry)
log_audio(out)
```